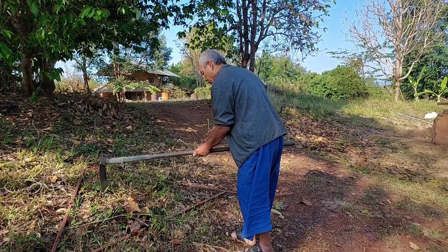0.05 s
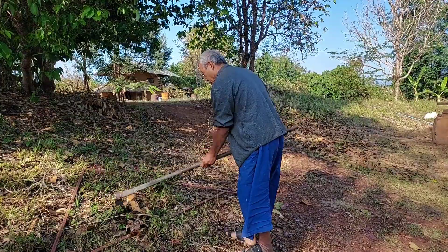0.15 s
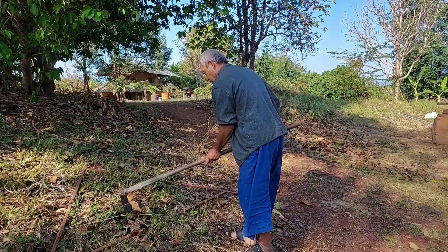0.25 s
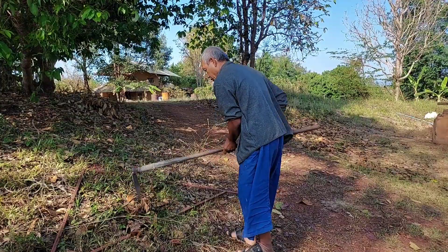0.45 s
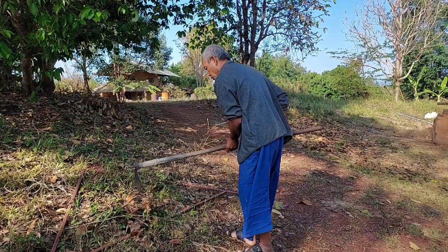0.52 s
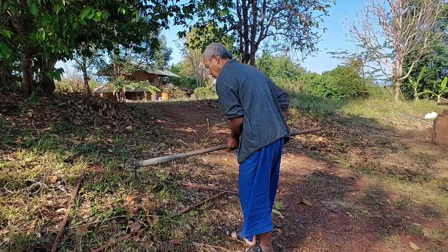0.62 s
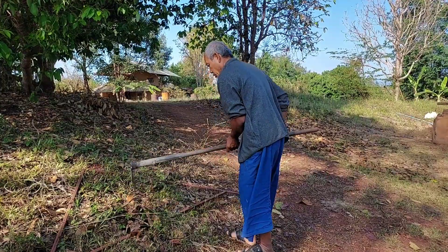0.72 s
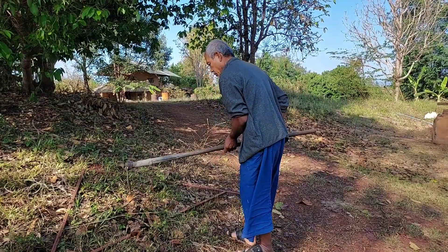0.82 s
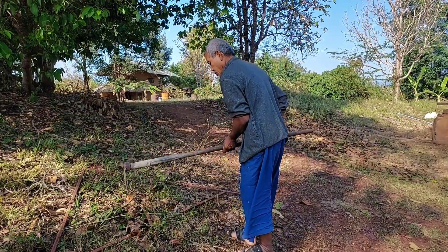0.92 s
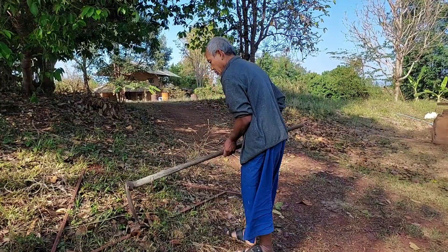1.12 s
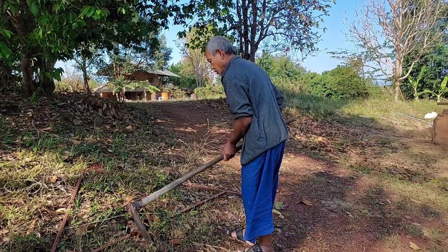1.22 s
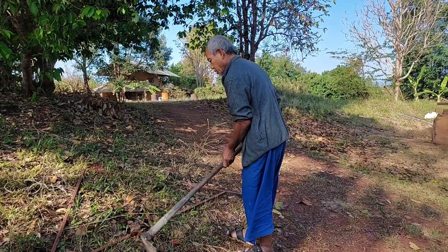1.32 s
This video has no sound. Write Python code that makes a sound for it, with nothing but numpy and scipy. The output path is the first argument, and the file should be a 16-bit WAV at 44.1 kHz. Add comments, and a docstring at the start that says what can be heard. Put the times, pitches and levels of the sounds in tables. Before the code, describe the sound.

Close by in still outdoor air, a long-handled hoe strikes dry ground once, clanking and knocking hard enough to slightly overload the microphone. Gritty crumbling follows, then a soft thud and faint ticks of falling dirt.

```python
"""A hoe stroke in dry soil

A long-handled hoe chops into a quiet, grassy hillside, close enough to overload the microphone.
The blade brushes the grass, then impact excites the modes of steel and handle: a clank and a wooden
knock, reflected by the bank and trees. Clods break in bursts of noise, and loose earth rustles and
ticks as the hoe is pulled free and lifted for the next stroke."""
import sys
import numpy as np
from scipy import signal
from scipy.fft import rfft, irfft
from scipy.io import wavfile

SR = 44100
rng = np.random.default_rng(int(sys.argv[2]) if len(sys.argv) > 2 else 0)


def store_wav(level_fs):
    """Save 16-bit WAV to argv[1]."""
    pcm = np.round(np.clip(np.atleast_2d(level_fs), -1, 1) * 32767)
    wavfile.write(sys.argv[1], SR, pcm.T.astype(np.int16))


N = 59535
T = np.arange(N) / SR
STOP_S = 0.23713   # the soil arrests the blade


def from_db(db):
    """Amplitude ratio: a factor of ten for every 20 dB."""
    return 10 ** (np.asarray(db) / 20)


def rms_one(x):
    """Normalisation to unit mean power."""
    return x / np.sqrt(np.mean(x ** 2) + 1e-20)


def envelope(curve):
    """Amplitude envelope, linear in decibels between rows of time_s, level_db."""
    return from_db(np.interp(T, *np.transpose(curve)))


def decay(start, t60):
    """Exponential damping: a sudden onset, then a fall of 60 dB in t60 seconds."""
    return (T >= start) * np.exp(-np.log(1000) * np.maximum(T - start, 0) / t60)


def ring(start, modes):
    """Modal superposition: one blow starts damped sinusoids of alternating sign."""
    return sum((-1) ** k * from_db(db) * decay(start, t60) * np.sin(2 * np.pi * hz * (T - start))
               for k, (hz, db, t60) in enumerate(modes))


def coloured(x, spectrum):
    """Spectral shaping by rows of frequency_hz, level_db, at unit rms."""
    hz, db = np.transpose(spectrum)
    bins_hz = np.maximum(np.arange(N // 2 + 1) * SR / N, 1)
    gain = from_db(np.interp(np.log(bins_hz), np.log(hz), db))
    return rms_one(irfft(rfft(x) * gain, N))


def noise(spectrum):
    """Gaussian noise with a shaped spectrum."""
    return coloured(rng.standard_normal(N), spectrum)


def grit(spectrum, grains_per_s=6800, spread_db=3.5, hiss_ratio=0.71):
    """Shot noise: dense random impulses of uneven size over a smooth hiss."""
    sizes = from_db(spread_db * np.minimum(rng.exponential(1, N), 4)) * rng.choice([-1, 1], N)
    grains = rms_one(sizes * (rng.random(N) < grains_per_s / SR))
    return coloured(grains + hiss_ratio * rng.standard_normal(N), spectrum)


def filtered(x, hz, kind, order=1):
    """Low- or high-pass filtering, 6 dB per octave for each order."""
    return signal.sosfilt(signal.butter(order, min(hz, SR / 2 - 1), kind, fs=SR, output="sos"), x)


def outdoors():
    """Ambient noise: soft broadband air and, near the end, a faint far chirring."""
    # loudness of the air and the chirring: time_s, level_db
    air_level = [(0, -64.5), (0.12, -64.5), (0.2, -64), (0.6, -66), (0.98, -63), (1.11, -65), (1.19, -65.5),
                 (1.28, -64), (1.35, -65.5)]
    chirr_level = [(0, -100), (1.15, -90), (1.22, -70), (1.3, -69.5), (1.35, -75)]
    # their spectra: frequency_hz, level_db
    air_colour = [(25, -2), (60, -3), (130, -2), (300, -10.5), (650, -10.5), (1000, -16.5), (1500, -19),
                  (3000, -20.5), (4800, -21.5), (6000, -29.5), (11000, -30.5), (15000, -44)]
    chirr_colour = [(100, -31), (650, -1.5), (1000, -7.5), (1400, 0.5), (1750, -1.5), (2300, -18),
                    (2900, 1), (3400, -18.5), (15000, -47)]
    return envelope(air_level) * noise(air_colour) + envelope(chirr_level) * noise(chirr_colour)


def handle_tap():
    """Heavily damped modes give a dull tap, probably the handle shifting in the grip."""
    # contact as the hoe swings again: start_s, level_db
    taps = [(1.141, -40.5)]
    # resonances of the tap: pitch_hz, level_db, t60_s
    modes = [(308.2, -6, .02), (700, -2.5, 0.0064), (1130, -1.5, 0.0062), (2877, -7, 0.0064),
             (3840, -7, 0.0042)]
    return sum(from_db(db) * ring(s, modes) for s, db in taps)


def ping():
    """Repeated excitation of two high modes, with a puff of hiss: perhaps a pebble skips on the steel."""
    # stuttering contacts: start_s, level_db
    contacts = [(0.7083, -44.5), (0.7205, -56), (0.7305, -58), (0.776, -59)]
    # thin resonances: pitch_hz, level_db, t60_s
    modes = [(7900, -3, 0.08), (8260, -6.5, .06)]
    # spectrum of the hiss: frequency_hz, level_db
    hiss_colour = [(2000, -14), (6000, -10), (8000, 2), (9000, -11), (12000, -10), (15000, -23)]
    hiss = from_db(-54) * noise(hiss_colour) * decay(contacts[0][0], t60=0.17)
    return sum(from_db(db) * ring(s, modes) for s, db in contacts) + hiss


def ground_thud():
    """Amplitude-modulated low noise: a rumble that swells as the ground thuds."""
    # swells of the rumble: time_s, level_db
    swells = [(0, -59.5), (0.19, -48.5), (0.232, -54), (0.247, -30), (0.27, -29), (0.305, -39.5),
              (0.41, -48), (0.48, -33.5), (0.535, -37), (0.57, -46.5), (0.7, -52.5), (1.12, -55),
              (1.15, -47), (1.19, -57), (1.35, -56)]
    # its spectrum: frequency_hz, level_db
    colour = [(10, -10), (25, -2.5), (45, 2), (75, -9), (130, -28.5), (250, -40), (1000, -74),
              (15000, -105)]
    return envelope(swells) * noise(colour)


def debris():
    """Impulse responses: crumbs and stalks tick in one mode each, a heavy lump in several low ones."""
    # crumbs land and stalks snap: start_s, level_db, pitch_hz, t60_s
    ticks = [(0.3402, -33.5, 3000, .003), (0.3537, -45, 4240, .015), (0.626, -39.5, 1980, 0.0031),
             (0.724, -38.5, 2760, 0.0077), (0.763, -41.5, 3300, 0.0044), (0.768, -43.5, 1450, .008),
             (0.8, -44, 4900, 0.0041), (0.821, -41.5, 1440, 0.012), (0.889, -46.5, 3640, .003),
             (0.9024, -41, 1382, 0.0034), (1.071, -49.5, 4814, 0.0026), (1.080, -45, 843, 0.0065)]
    # the lump drops: start_s, level_db
    lumps = [(0.482, -35)]
    # resonances of its landing: pitch_hz, level_db, t60_s
    lump_modes = [(181, -11, 0.052), (365, -8.5, 0.065), (528, -6, 0.024), (753, -8, 0.046)]
    ticking = sum(ring(s, [(hz, db, t60)]) for s, db, hz, t60 in ticks)
    return ticking + sum(from_db(db) * ring(s, lump_modes) for s, db in lumps)


def sliding_earth():
    """Granular friction: earth and dry leaves slide off the blade, which drags briefly on the way out."""
    # loudness of the slide and the drag: time_s, level_db
    slide_level = [(0, -65.5), (0.33, -98), (0.36, -53.5), (0.42, -59.5), (0.445, -52), (0.48, -60.5),
                   (0.535, -56.5), (0.575, -59), (0.62, -53), (0.655, -57), (0.69, -54), (0.72, -52.5),
                   (0.75, -60), (0.83, -65), (0.95, -69), (1.1, -83.5), (1.35, -83)]
    drag_level = [(0.59, -100), (0.604, -55.5), (0.626, -49), (0.636, -65.5), (0.67, -100)]
    # their spectra: frequency_hz, level_db
    slide_colour = [(100, -13), (300, -5), (800, -1.5), (1500, -3), (3400, -8), (5000, -8.5), (6200, -15),
                    (8000, -18), (11500, -27), (15000, -35.5)]
    drag_colour = [(200, -21.5), (500, -6), (1050, -1), (1500, 1.5), (1900, -5.5), (2400, -9),
                   (3200, -17.5), (15000, -45.5)]
    return envelope(slide_level) * grit(slide_colour) + envelope(drag_level) * grit(drag_colour)


def clods():
    """Brittle fracture: grass and clods crushed by the blade give short gritty bursts."""
    # fractures: start_s, level_db, t60_s, lowpass_hz
    fractures = [(0.2106, -39, 0.056, 2200), (0.2235, -43, .08, 3520), (0.2964, -33, 0.091, 1610),
                 (0.312, -45, 0.15, 4000), (0.3204, -36, 0.066, 3500), (0.325, -38, 0.034, 9000),
                 (0.333, -39.5, 0.083, 6030), (0.339, -35, 0.062, 6200)]
    # spectrum of the grit: frequency_hz, level_db
    colour = [(100, -18.5), (350, -14), (750, 3), (1200, -4), (1700, -0.5), (2600, -7), (3400, -3),
              (4600, -7.5), (5900, -5), (6700, -20.5), (15000, -22.5)]
    bursts = sum(from_db(db) * filtered(grit(colour) * decay(s, t60), hz, "low")
                 for s, db, t60, hz in fractures)
    return filtered(bursts, hz=380, kind="high", order=2)   # small crumbs radiate little bass


def hillside(blow):
    """Reflection and scattering: two dull echoes, a short diffuse wash and a faint far tail."""
    # reflections from the bank and trunks: delay_s, level_db
    reflections = [(0.0156, -21.5), (0.02305, -32)]
    # spectrum scattered by ground and trees: frequency_hz, level_db
    scatter_colour = [(60, -22), (300, -18), (600, -11), (900, -1.5), (1300, -5), (1900, -10.5), (3400, -9),
                      (6000, -18), (10000, -24), (15000, -31)]
    dull = filtered(blow, hz=1160, kind="low", order=2)
    echoes = sum(from_db(db) * np.interp(T - delay, T, dull) for delay, db in reflections)
    near = from_db(-24.5) * decay(STOP_S, t60=0.10)
    far = from_db(-43.5) * decay(STOP_S, t60=0.45)
    return echoes + noise(scatter_colour) * (near + far)


def chop(buried_db=-14.5, bury_s=0.001):
    """Impact excitation: each contact rings blade and handle and crunches soil; burial damps the steel."""
    # the hoe bites, grates and is stopped: start_s, blade_db, knock_db, crunch_db
    bites = [(0.23035, 3.5, -11, -20.5), (0.2329, -8.5, -16.5, -8.5), (0.2372, -17.5, -0.2, -20)]
    # modes of the steel blade, and of the handle with its head: pitch_hz, level_db, t60_s
    blade_modes = [(1311, -16, 0.1), (1680.5, -4.5, 0.054), (1756, -11.5, 0.018), (1894, -12, 0.06),
                   (2424, -7, 0.028), (2900, -19.5, 0.071), (3127, -17, 0.067), (3444, -10.5, 0.038),
                   (4130, -24, 0.098), (5392, -30, 0.04), (7450, -27.5, 0.032)]
    knock_modes = [(208, -23.5, .058), (551, -17, 0.046), (708.5, -10, 0.03), (906, 5.5, 0.014),
                   (1090.6, 2.5, 0.019), (1110, -17.5, 0.033)]
    # spectrum of the crunching soil: frequency_hz, level_db
    crunch_colour = [(100, -36), (500, -9.5), (1000, -3), (3300, 0.5), (5000, -7.5), (8000, -15),
                     (15000, -24.5)]
    soil = grit(crunch_colour)
    burial = 1 - np.exp(-np.maximum(T - STOP_S, 0) / bury_s)
    choke = from_db(buried_db * burial)
    blow = np.zeros(N)
    for start, blade_db, knock_db, crunch_db in bites:
        clank = from_db(blade_db) * ring(start, blade_modes)
        knock = from_db(knock_db) * ring(start, knock_modes)
        crunch = from_db(crunch_db) * decay(start, t60=0.026) * soil
        blow += choke * (clank + crunch) + knock
    return blow


def scene():
    """Superposition: one stroke of the hoe over still outdoor air, in mono."""
    blow = chop()
    stroke = blow + hillside(blow) + clods() + sliding_earth() + debris() + ground_thud()
    return (stroke + ping() + handle_tap() + outdoors())[None]


def record(dry, overload=0.72, low_cut_hz=110, stopband_hz=16250):
    """Saturation and band limiting: the microphone flattens the peaks; the bass and the top are cut."""
    flattened = dry / (1 + (dry / overload) ** 4) ** (1 / 4)
    thinned = filtered(flattened, low_cut_hz, "high", order=2)
    return signal.sosfilt(signal.cheby2(20, 70, stopband_hz, fs=SR, output="sos"), thinned)


dry = scene()
out = record(dry)
store_wav(out)
```